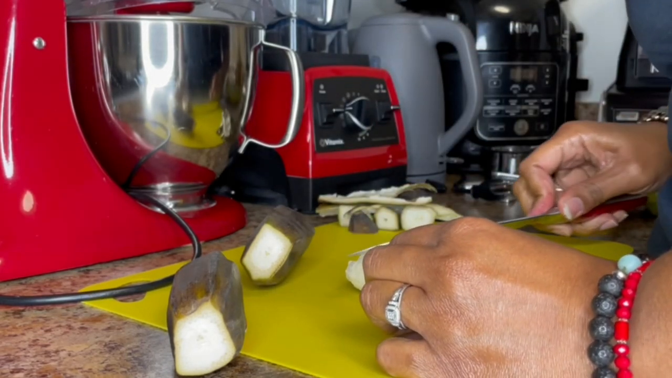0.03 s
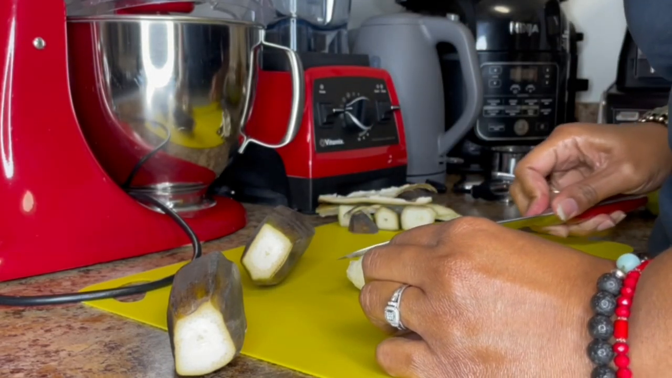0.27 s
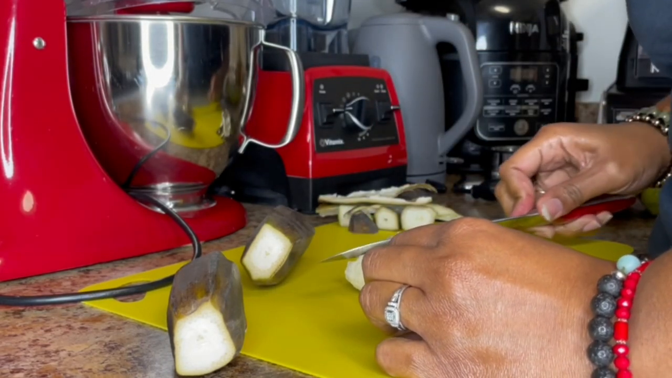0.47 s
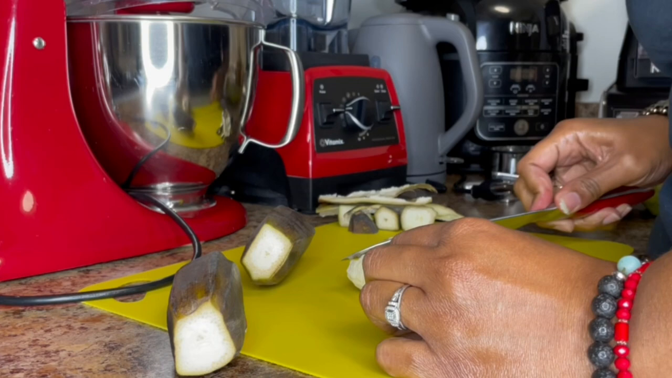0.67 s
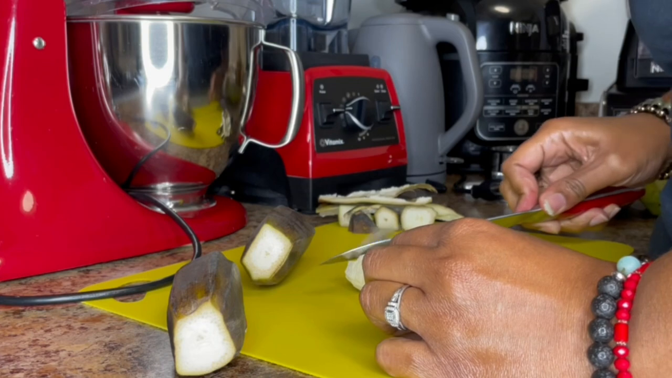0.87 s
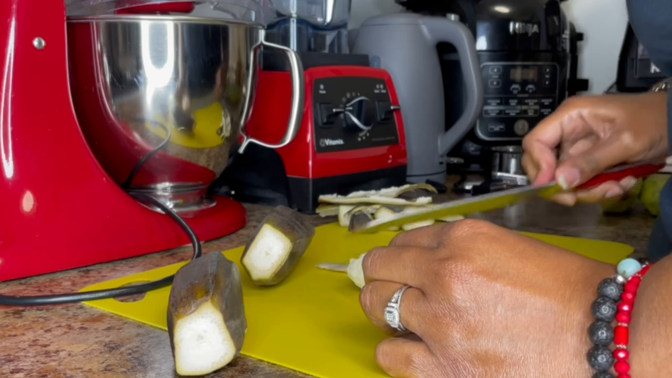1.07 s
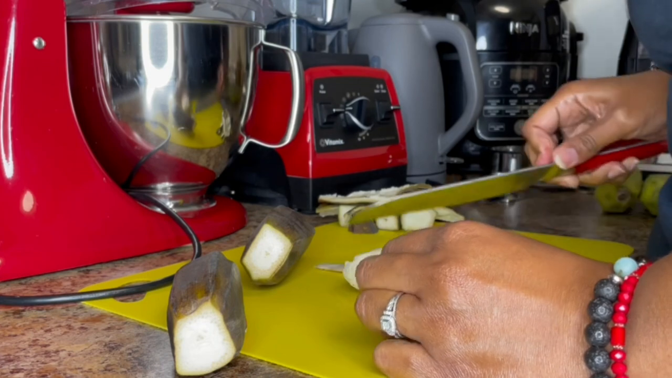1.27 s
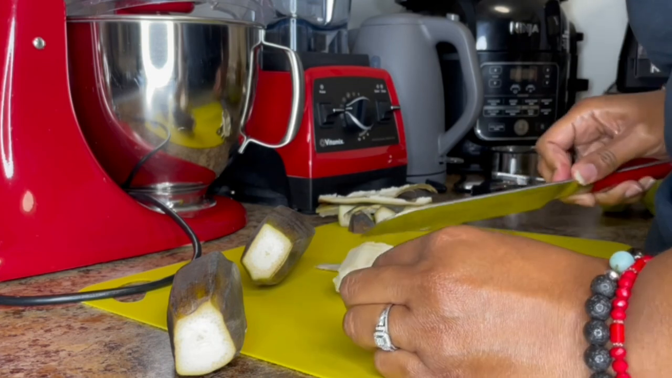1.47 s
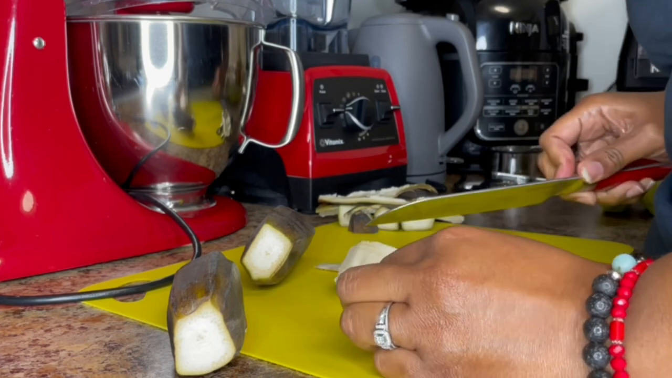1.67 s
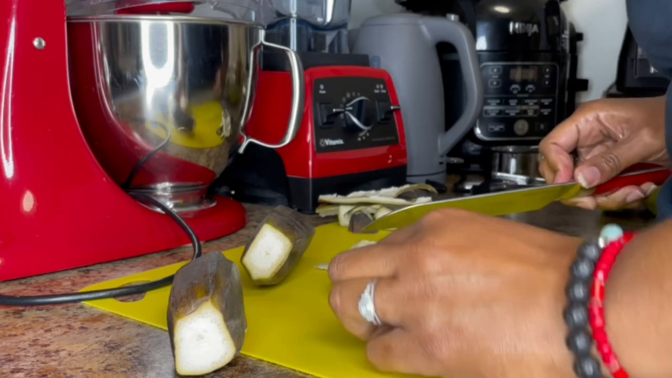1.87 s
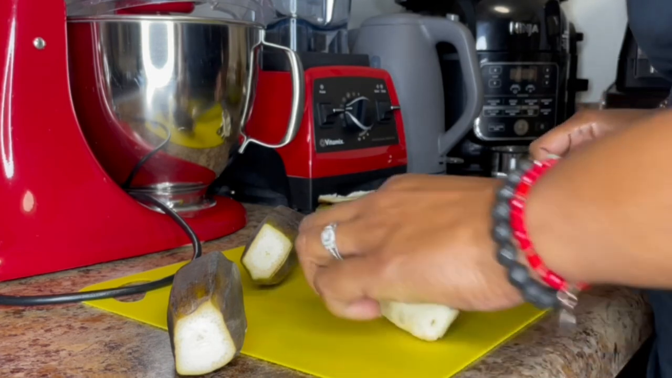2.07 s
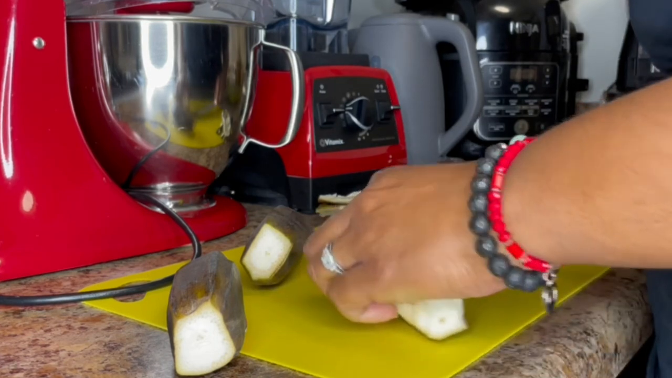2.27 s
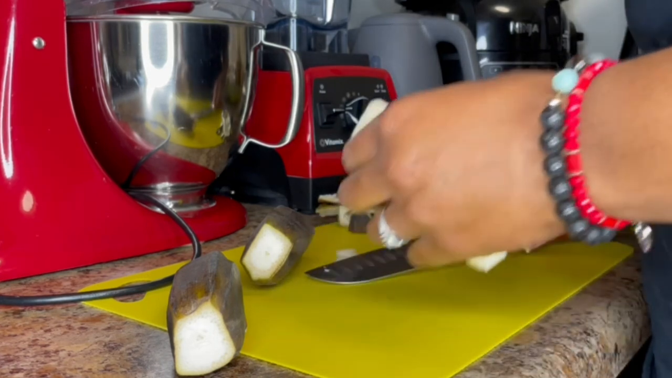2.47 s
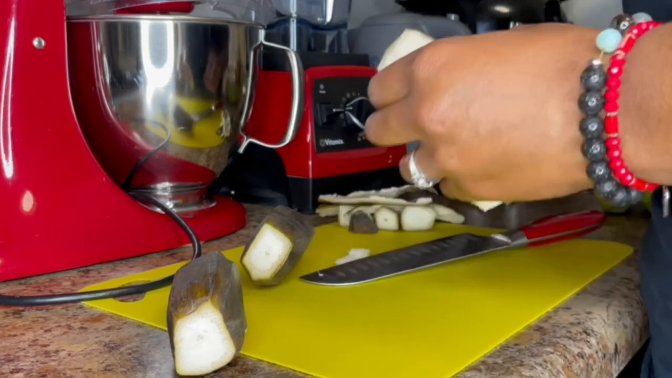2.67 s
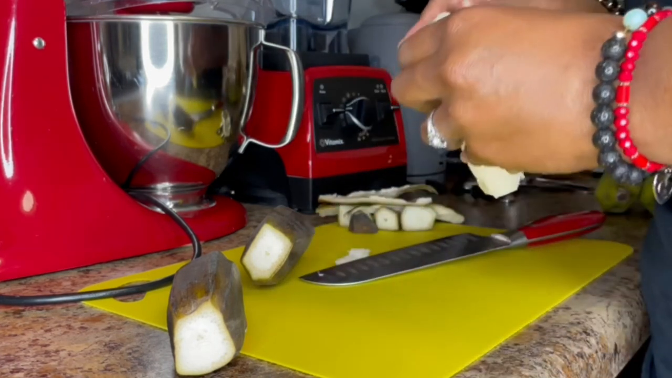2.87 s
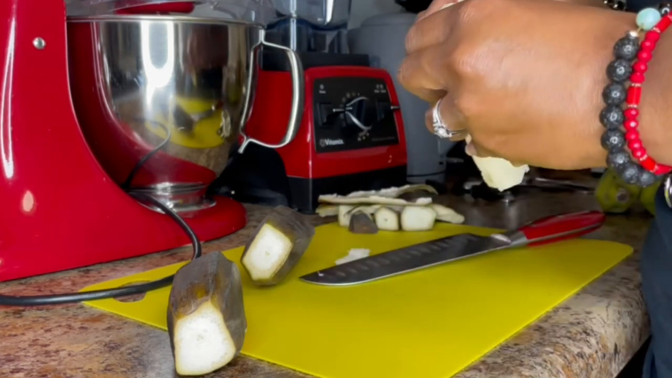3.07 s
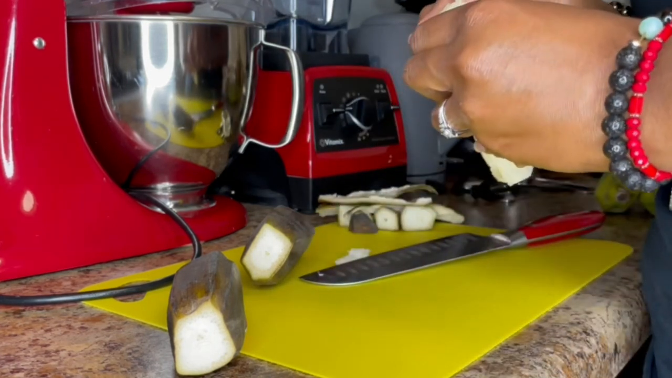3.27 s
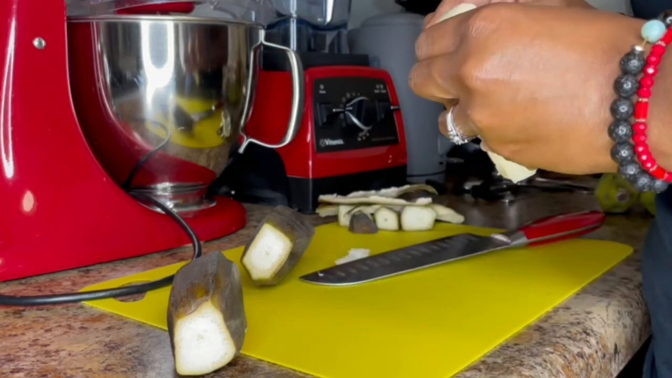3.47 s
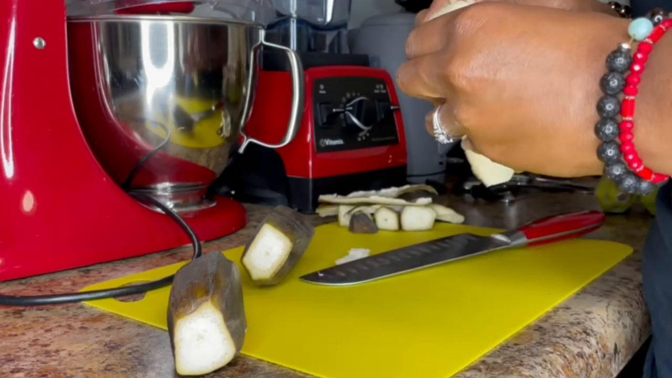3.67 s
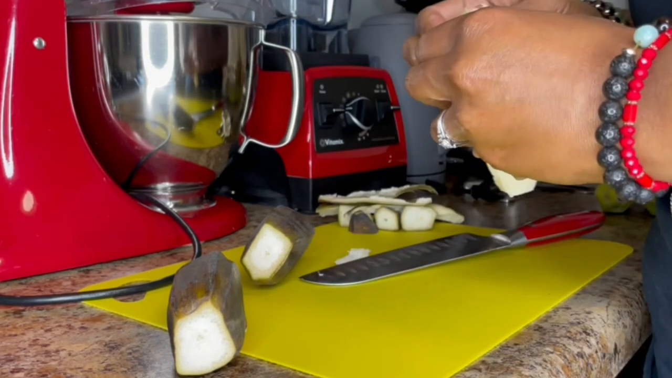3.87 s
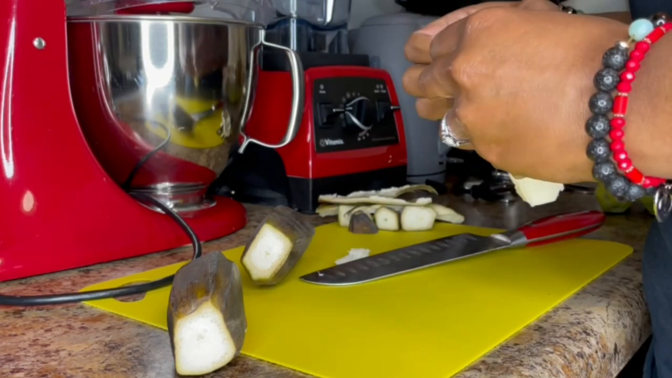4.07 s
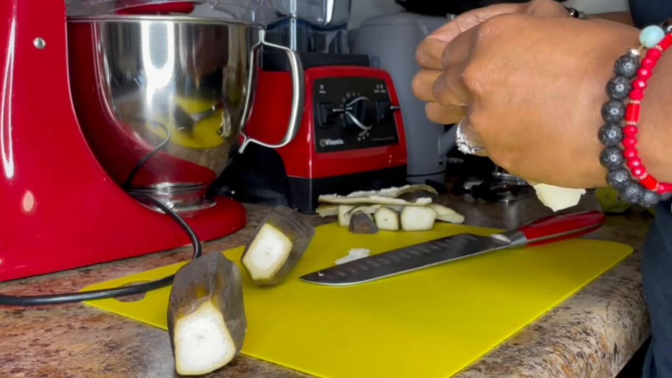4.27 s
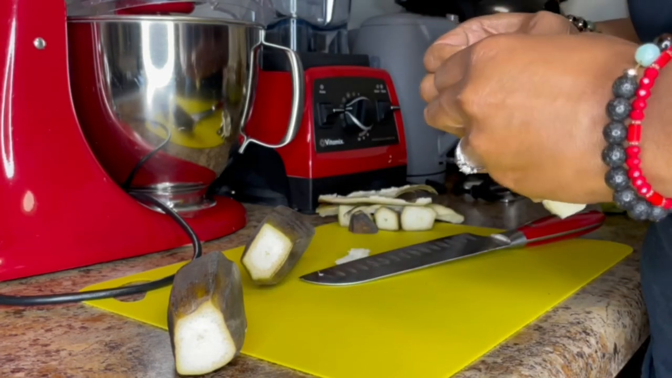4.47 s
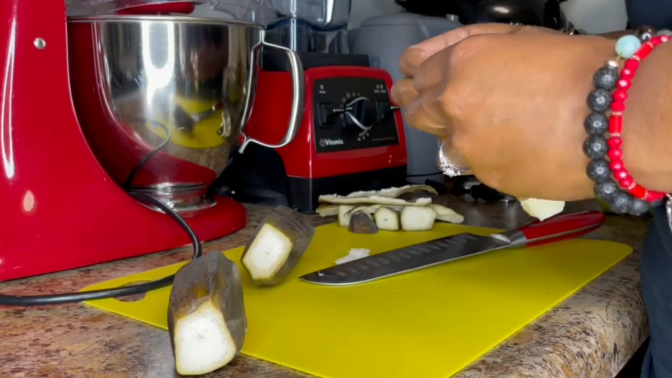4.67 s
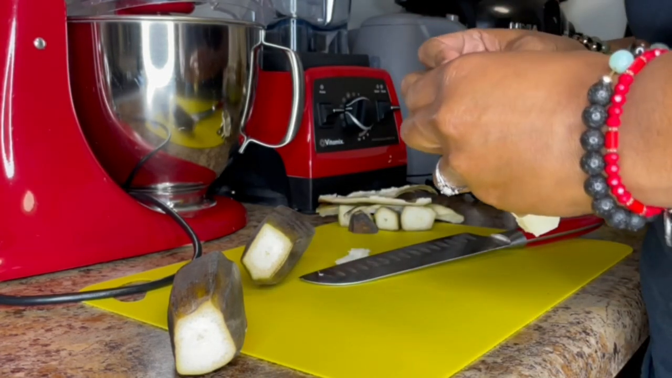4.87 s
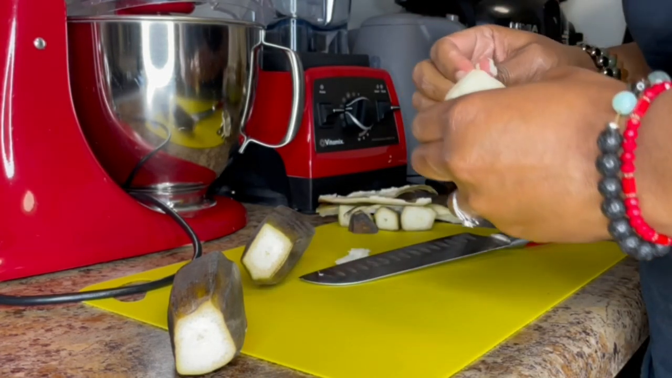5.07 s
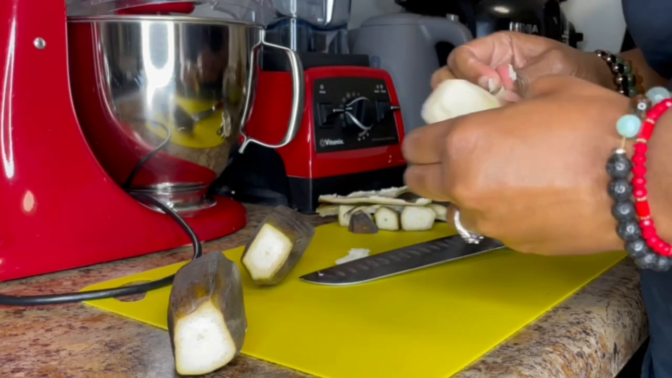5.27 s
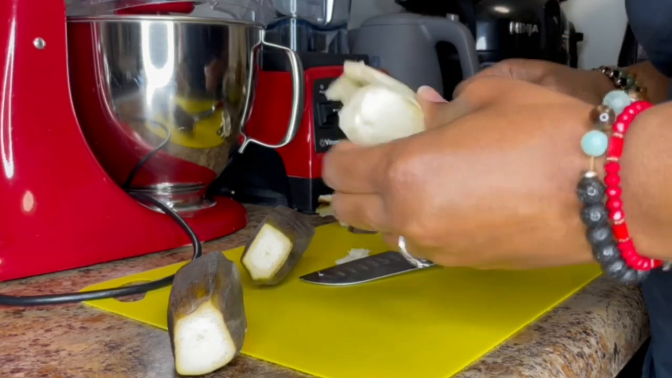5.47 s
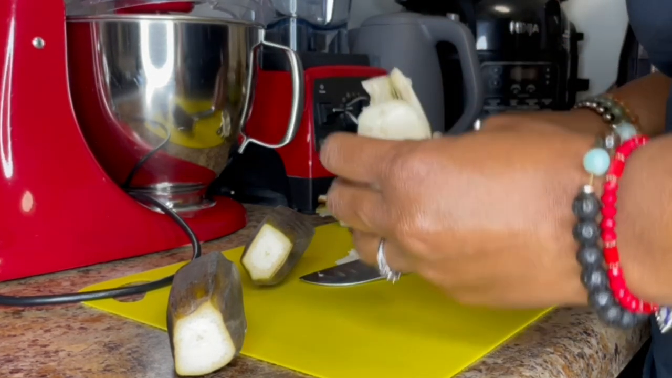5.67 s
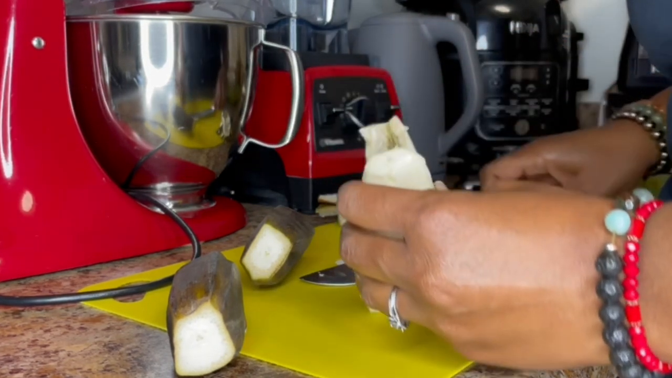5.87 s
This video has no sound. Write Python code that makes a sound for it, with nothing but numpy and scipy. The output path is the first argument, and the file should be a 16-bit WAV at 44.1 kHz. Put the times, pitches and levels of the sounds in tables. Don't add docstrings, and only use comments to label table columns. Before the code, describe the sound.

Hands peel a thick green banana in a quiet kitchen: soft sliding, one hard dull board knock, then crackling fibres, wet smacks and short rips.

```python
import sys
import numpy as np
from scipy import signal
from scipy.fft import rfft, irfft
from scipy.io import wavfile

SR = 44100
rng = np.random.default_rng(int(sys.argv[2]) if len(sys.argv) > 2 else 0)


def volts_from_decibels(level):
    exponent = np.asarray(level, float) / 20
    return 10 ** exponent


def log_audio(samples):
    frames = np.atleast_2d(samples).T
    limited = np.clip(frames, -1, 1)
    pcm = np.round(limited * 32767).astype(np.int16)
    wavfile.write(sys.argv[1], SR, pcm)


N = 261504
T = np.arange(N) / SR
AGE = T[:SR // 3]


def rms_one(x):
    return x / np.sqrt(np.mean(x ** 2) + 1e-20)


def peak_one(x):
    return x / np.abs(x).max()


def at_hz(points, hz):
    table_hz, value = np.array(points).T
    return np.interp(np.log(np.maximum(hz, 1)), np.log(table_hz), value)


def colour(x, points):
    hz = np.arange(x.shape[-1] // 2 + 1) * SR / x.shape[-1]
    closed = [(points[0][0] / 2, -60)] + list(points) + [(points[-1][0] * 1.6, -60)]
    return rms_one(irfft(rfft(x) * volts_from_decibels(at_hz(closed, hz)), x.shape[-1]))


def band(x, low_hz, high_hz):
    edges = [low_hz, min(high_hz, .45 * SR)]
    return signal.sosfilt(signal.butter(2, edges, "band", fs=SR, output="sos"), x)


def drift(rate):
    knots = np.arange(0, N / SR + 1, 1 / rate)
    return np.interp(T, knots, rng.standard_normal(800)[:len(knots)])


def ring(clicks, hz, t60):
    r, w = volts_from_decibels(-60 / (t60 * SR)), 2 * np.pi * hz / SR
    return signal.lfilter([0, np.sin(w)], [1, -2 * r * np.cos(w), r * r], clicks + 1e-18)


def burst(ms):
    return rng.standard_normal(len(AGE)) * (np.exp(-AGE * 1000 / max(ms, .1)) + 1e-12)


def unit_click():
    return (AGE == 0) + 1e-12


def add(out, s, piece):
    i = round(s * SR)
    out[i:i + len(piece)] += piece[:N - i]


def rings(table, rough_ms):
    out = np.zeros(N)
    for s, peak_db, hz, t60 in table:
        tone = ring(burst(rough_ms), hz, max(t60, .004))
        add(out, s, volts_from_decibels(peak_db) * peak_one(tone))
    return out


def gestures(s, hold, db, rise, fall):
    t = T[::32, None]
    early_db = rise * np.maximum(s - t, 0)
    late_db = fall * np.maximum(t - s - np.abs(hold), 0)
    power = np.sum(volts_from_decibels(db - early_db - late_db) ** 2, axis=1)
    return np.interp(T, t[:, 0], np.sqrt(power))


def two_ports(mid, side, alike):
    alike = np.clip(alike, -1, 1)
    return np.sqrt(1 + alike) * mid + np.sqrt(1 - alike) * side * [[1], [-1]]


# pitch_hz, level_db (per Hz)
RUMBLE_TONE = [(30, -11.5), (55, 2.5), (80, -9.5), (120, -9.5)]
# time_s, level_db
RUMBLE_LEVEL = [(0.0, -70), (0.08, -54.5), (0.31, -65.5), (0.69, -64), (0.94, -59), (1.45, -69.5),
                (1.83, -69.5), (2.29, -58.5), (2.48, -62), (2.73, -61.5), (3.0, -66.5), (3.3, -60),
                (3.63, -65), (4.35, -70), (4.59, -66), (5.05, -76.5), (5.3, -72), (5.93, -65.5)]


def rumble():
    level_db = np.interp(T, *np.transpose(RUMBLE_LEVEL))
    return volts_from_decibels(level_db) * colour(rng.standard_normal(N), RUMBLE_TONE)


# pitch_hz, level_db (per Hz)
AIR_TONE = [(12, -42.5), (20, -12), (77, 0.5), (337, -15), (446, -10.5), (718, -16), (780, -18.5),
            (949, -24), (1190, -21), (2820, -38.5), (7110, -44), (8650, -49), (12100, -38.5),
            (13200, -30.5), (16000, -42)]
# pitch_hz, likeness (0-1)
AIR_LIKENESS = [(30, 0.99), (60, 0.1), (130, 1), (290, 0), (640, 0.), (1400, 0), (3100, 0), (7000, 0),
                (13000, 0.13)]
# pitch_hz, width_hz, level_db
WHINES = [(214, 5, -76), (787.5, 6.6, -84), (15800, 40, -96)]


def hum():
    hz = np.arange(N // 2 + 1) * SR / N
    mid, side = rfft(rng.standard_normal((2, N)))
    room = colour(irfft(two_ports(mid, side, at_hz(AIR_LIKENESS, hz)), N), AIR_TONE)
    level = volts_from_decibels(-65 + 2.3 * drift(5))
    flicker = (volts_from_decibels(4.0 * drift(11)) - 1) * band(room, 5000, 18000)
    tones = 0
    for pitch_hz, width_hz, db in WHINES:
        tones = tones + volts_from_decibels(db) * rms_one(ring(rng.standard_normal(N), pitch_hz, 2.7 / width_hz))
    return level * (room + flicker) + tones


# pitch_hz, t60_s
ROOM_DECAY = [(100, .26), (300, .33), (1000, .26), (4000, .27), (13000, .17)]
# pitch_hz, likeness (0-1)
ROOM_LIKENESS = [(100, 0.8), (300, 0.5), (600, 0), (2000, 0), (6000, 0.1), (13000, 0.85)]


def kitchen(x):
    age = T[:SR // 2]
    white = rng.standard_normal((2, 2, len(age)))
    edges = 90 * 2. ** np.arange(0, 8, .5)
    tail = 0
    for k, (low_hz, high_hz) in enumerate(zip(edges, edges[1:])):
        mid, side = band(white[k % 2], low_hz, high_hz)
        pair = two_ports(mid, side, at_hz(ROOM_LIKENESS, low_hz))
        late = volts_from_decibels(-60 * age / at_hz(ROOM_DECAY, low_hz))
        early = volts_from_decibels(2.5 - 60 * age / 0.035)
        tail = tail + pair * (late + early)
    tail = tail * np.clip(age / 0.00033, 0, 1)
    tail = tail / np.sqrt(np.sum(tail ** 2) / 2)
    return signal.fftconvolve(x[None], tail, axes=1)[:, :N]


# start_s, peak_db, pitch_hz, t60_s
BUMPS = [(0.97, -47, 117, .15), (2.544, -21.5, 612, .07), (2.544, -18.5, 1034, .05),
         (2.544, -22, 335, 0.08), (2.544, -24, 710, 0.071), (2.544, -24, 890, .06),
         (0.952, -44.5, 328, 0.11), (0.955, -45, 448, .1), (0.955, -46, 239, .12),
         (2.552, -21.5, 119.8, 0.2), (2.545, -22.5, 788, 0.11), (2.546, -22, 272, .25),
         (2.275, -39, 151, .09), (2.645, -39, 115, 0.13), (2.75, -51, 247.3, 0.2),
         (5.685, -51, 119.4, 0.19), (5.85, -58.5, 90, 0.069), (5.89, -49, 112, 0.28)]


def bumps():
    return band(rings(BUMPS, 6.5), 93, 1800)


# pitch_hz, level_db (per Hz)
WEIGHT_TONE = [(70, 2), (130, -4.5), (250, 2.5), (450, -2), (800, -15)]
# start_s, hold_s, level_db
LEANS = [(0.01, 0.12, -53), (0.385, 0.025, -60.5), (0.493, .01, -84), (0.73, 0.036, -68),
         (0.884, .005, -60), (1.075, 0.024, -64), (1.334, 0.0055, -59.5), (1.441, 0.025, -61.5),
         (1.552, 0.29, -68.5), (1.919, 0.039, -63.5), (2.07, .01, -73), (2.108, .005, -76),
         (2.156, 0.027, -47), (2.292, 0.016, -43.5), (2.427, 0.18, -51), (2.815, 0.033, -57.5),
         (2.9, 0.24, -67.5), (3.286, .11, -69), (3.475, 0.11, -77.5), (3.722, .02, -68),
         (3.907, 0.0097, -70), (4.057, .03, -74), (4.32, 0.038, -68.5), (4.416, 0.025, -60),
         (4.502, .2, -74), (5.059, .01, -72.5), (5.168, 0.14, -66), (5.45, .02, -68), (5.898, .06, -56.5)]


def leans():
    press = gestures(*np.transpose(LEANS), rise=290, fall=1200)
    return press * colour(rng.standard_normal(N), WEIGHT_TONE)


def blow(low, middle, high, top, slap_db, crack_db, tick_db):
    thud = volts_from_decibels(5.5) * band(band(low, 290, 870), 99, 1300)
    slap = volts_from_decibels(slap_db + 7.5) * band(middle, 600, 1500)
    crack = volts_from_decibels(crack_db + 3.0) * band(high, 2100, 4500)
    tick = volts_from_decibels(tick_db + 7.0) * band(top, 9500, 21000)
    return thud + slap + crack + tick


def rough_blow(ms, slap_db, crack_db, tick_db):
    contacts = burst(4.0 * ms), burst(1.0 * ms), burst(0.41 * ms), burst(0.83 * ms)
    return blow(*contacts, slap_db, crack_db, tick_db)


# pitch_hz, level_db, t60_s
BOARD_MODES = [(117, -6, 0.15), (220.6, -12, 0.15), (272, -5, 0.24), (328.9, -1, 0.11), (410, -1, 0.092),
               (490, -11, 0.054), (545, -7, .1), (609, -3, 0.07), (734, -7, 0.07), (883, -7.5, 0.12),
               (1028, 3, 0.033), (1410, -12, 0.018), (1545.4, 1.5, 0.05), (1973, -9, 0.1)]
# start_s, peak_db, slap_db (0.6-1.5 kHz), crack_db (2.1-4.5 kHz), tick_db (over 9.5 kHz),
# contact_ms
KNOCKS = [
    (0.947, -28.5, -8, 0, -13, 5.5),
    (2.2631, -24, -3.5, -0.5, -25, 8.4),
    (2.5428, -2.5, -1, -16.5, -34.5, 4.8),
]


def knocks():
    near, wide, bare = np.zeros((3, N))
    click = unit_click()
    for s, peak_db, slap_db, crack_db, tick_db, ms in KNOCKS:
        contact = burst(0.21 * ms)
        body = 0
        for hz, db, t60 in BOARD_MODES:
            tone = peak_one(ring(contact, hz, min(t60, .22)))
            body = body + volts_from_decibels(db + slap_db * (hz > 700)) * tone
        body = band(body, 140, 4200)
        middle = rough_blow(ms, slap_db, crack_db, tick_db)
        ends = rough_blow(ms, slap_db, crack_db, tick_db)
        plain = blow(click, click, click, click, slap_db - 0.5, crack_db - 6.0, tick_db - 6)
        add(near, s, volts_from_decibels(peak_db) * (volts_from_decibels(-12.0) * body + volts_from_decibels(-4) * middle))
        add(wide, s, volts_from_decibels(peak_db - 3.0) * band(ends, 320, 9500))
        add(bare, s, volts_from_decibels(peak_db + 22.0) * plain)
    return near, wide, bare


# start_s, peak_db, pitch_hz, t60_s
DRAGS = [(2.425, -58, 1030, .025), (2.46, -57, 1100, .025), (2.485, -58, 980, .025),
         (2.34, -54, 2200, .006), (2.195, -54, 1650, .008), (5.845, -62, 1300, .008)]


def drags():
    return rings(DRAGS, 40.0)


# start_s, peak_db, pitch_hz, t60_s
BEADS = [(0.16, -62, 13400, .01), (2.0303, -39.5, 13200, 0.011), (2.1145, -34.5, 13150, 0.022),
         (2.123, -36, 13120, 0.02), (5.4116, -56, 13200, 0.017), (5.465, -54.5, 13260, 0.02),
         (5.6261, -51, 13250, 0.048), (5.7095, -50, 13280, 0.025), (5.7275, -56.5, 13140, 0.03)]


def bead_ticks():
    return rings(BEADS, 0.12)


# start_s, peak_db, body_db (1.3-5.5 kHz),
# length_ms
SNAPS = [(0.17, -62, -20, .8), (0.199, -64, -20, .8), (2.543, -36, 8, 2.5), (2.029, -46, -35, 1.4),
         (2.045, -50, -27, 1.8), (2.1357, -61.5, 14, 1.3), (2.5412, -19.5, -3, 1.3), (0.9464, -41, 0.5, 1),
         (3.218, -58, -18, 0.92), (3.299, -41, -15, 2.8), (3.229, -52, -32, 1.2), (3.244, -36.5, -30, 0.79),
         (3.3659, -37, -25.5, 0.91), (3.486, -50, -21, 1.3), (3.5105, -49, -25, 0.82),
         (3.7743, -61, -17, 1.85), (4.1401, -61.5, -25, 1.28), (4.5466, -56.5, -29, 2.2),
         (4.6099, -66, -16, 1.47), (4.7337, -54, -18.5, 1.4), (4.776, -60.5, -24, 0.44),
         (5.1105, -42, -13, 0.74), (5.4642, -60, -19, 0.82), (5.5275, -61, -19.5, 0.69),
         (5.6234, -55, -27, 3), (5.839, -77.5, 12.5, 1.5), (5.1775, -52, 8, .5), (5.2528, -52, 5, .4),
         (5.155, -55, -3, 1.2), (5.035, -63, -10, .8), (4.957, -62, 3, .6), (4.4013, -46, -4, 0.73),
         (4.4113, -44, -1, 1)]


def snaps():
    near, bare = np.zeros((2, N))
    click = unit_click()
    for s, peak_db, body_db, ms in SNAPS:
        crack = burst(ms)
        for level_db, low_hz, high_hz in (6.5, 7800, 24000), (6.5 + body_db, 1300, 5500):
            piece = volts_from_decibels(peak_db + level_db) * peak_one(band(crack, low_hz, high_hz))
            add(near, s, piece)
            strength = np.sqrt(np.mean(piece ** 2))
            add(bare, s, strength * rms_one(band(click, low_hz, high_hz)))
    return near, bare


# start_s, peak_db, pitch_hz, t60_s
SMACKS = [(1.7178, -61, 1250, 0.023), (1.9207, -61, 1310, 0.012), (3.3032, -42.5, 1160, 0.009),
          (3.8294, -63.5, 1076, 0.02), (3.9174, -63, 1500, 0.021), (3.9953, -60, 1034, 0.026),
          (4.052, -62.5, 1333, 0.03), (4.6385, -63, 1255, 0.032), (4.775, -63.5, 1300, 0.027),
          (4.9557, -54, 1357, 0.019), (5.1105, -55, 1320, .015), (4.402, -40, 1550, .012)]


def smacks():
    return rings(SMACKS, 1.6)


# start_s, peak_db, pitch_hz, t60_s
SQUEAKS = [(5.163, -41, 1310, .05), (5.2036, -45, 1420, .025), (5.224, -47, 1290, .03),
           (5.2475, -41.5, 1300, .03), (5.259, -44.5, 1278, 0.025), (5.289, -41, 1460, .02),
           (5.311, -48, 1395, .02), (5.872, -41, 3500, .025), (5.872, -41, 1380, 0.019),
           (5.885, -40, 1500, 0.031), (5.89, -43, 3500, .015), (5.906, -40.5, 1800, 0.014),
           (5.915, -43, 3080, .02), (5.92, -44, 1090, .02), (5.879, -43, 870, .025)]


def squeaks():
    return rings(SQUEAKS, 5.2)


# pitch_hz, level_db (per Hz)
SQUELCH_TONE = [(550, -9), (900, -10.5), (1100, -6), (1300, -1.5), (1500, -4.5), (1750, -7.5), (2400, -20)]
RASP_TONE = [(1600, -3.5), (2400, 0), (3500, 9), (5500, 3.5), (8000, -11), (10500, -22)]
HISS_TONE = [(6000, -17.5), (8500, 2.5), (10500, -6.5), (13000, -2.5), (15000, -6), (16500, -11)]


def rub_layers():
    sizes = volts_from_decibels(2.6 * np.minimum(rng.exponential(1, N), 5))
    slips = rng.random(N) < 12000.0 / SR
    grains = slips * sizes * rng.choice([-1, 1], N) * volts_from_decibels(2.8 * drift(60))
    squelch = colour(grains * sizes ** 0.36, SQUELCH_TONE)
    return squelch, colour(grains, RASP_TONE), colour(grains, HISS_TONE)


def rub(layers, table, rise, falls):
    s, hold, db, wet_db, hiss_db = np.transpose(table)
    out = 0
    for layer, level_db, fall in zip(layers, (db + wet_db, db, db + hiss_db), falls):
        out = out + layer * gestures(s, hold, level_db, rise, fall)
    return out


# start_s, hold_s, rasp_db, squelch_over_rasp_db, hiss_over_rasp_db
SLIDES = [(0.025, 0.096, -64, 5, 8), (.2, 0.081, -81.5, 2, 13.5), (.384, 0.072, -76, 2, 13),
          (.536, 0.13, -85.5, 4, 18), (.752, 0.0097, -81.5, 10, 21.5), (.81, 0.037, -95, 10, 18),
          (.872, 0.0058, -66, -2.5, 16), (1.348, .005, -77, 4, 3), (1.428, 0.049, -82, 6, -11),
          (1.69, 0.051, -90.5, 13, 12), (1.872, 0.038, -74, -3, 9), (2.06, 0.025, -83, 7, 6),
          (2.218, 0.013, -64.5, 2, -25), (2.3, 0.054, -68, 9, -9), (2.365, 0.024, -60.5, -6, -43),
          (2.43, 0.048, -72, 6.5, -18), (2.82, 0.0089, -79.5, 13, -18.5)]
SLIDE_FALL = (400, 390, 420)


def slides(layers):
    return rub(layers, SLIDES, 330, SLIDE_FALL)


# start_s, hold_s, rasp_db, squelch_over_rasp_db, hiss_over_rasp_db
FINGERS = [(3.03, 0.069, -90.5, 7, 15), (3.12, 0.019, -86, 12, 22.5), (3.2, 0.046, -93, -1, 27.5),
           (3.49, 0.029, -86.5, 1.5, 16), (3.624, 0.023, -88.5, 14.5, 1), (3.79, 0.043, -90, 13.5, 20),
           (3.912, 0.0048, -80, 13, 16), (3.96, 0.088, -91.5, 15.5, 15), (4.05, 0.029, -78.5, 2.5, 15.5),
           (4.14, 0.073, -90.5, 2.5, 19), (4.31, .01, -78, -8, 14), (4.47, 0.021, -78, -3.5, -3.5),
           (4.55, 0.1, -93, 11.5, 21), (4.76, 0.094, -99, 4.5, 17.5), (4.89, 0.021, -83.5, 10.5, 23),
           (4.96, 0.005, -63, -6, 14), (5.0, 0.2, -71.5, -9, 11.5), (5.47, 0.26, -99, -3, 17.5),
           (5.84, 0.014, -79, -2, 6)]
FINGER_FALL = (670, 750, 890)


def fingers(layers):
    return rub(layers, FINGERS, 400, FINGER_FALL)


# start_s, hold_s, rasp_db, squelch_over_rasp_db,
# hiss_over_rasp_db
TEARS = [(2.116, 0.0034, -84.5, 23, 0), (2.14, 0.012, -48, 3, -19), (2.515, 0.0045, -55, 0, -14),
         (2.528, 0.014, -67, 26, -19), (3.246, 0.02, -67.5, -3, 20.5), (3.268, .025, -62.5, -13, 9),
         (3.298, 0.0062, -48.5, -5.5, 11.5), (3.37, 0.0043, -81.5, 17, 19), (4.397, .004, -54, -4, 14),
         (5.13, .025, -62, 0, 9.5), (5.155, 0.031, -47, -3.5, 1), (5.2, 0.052, -54, 4.5, 4),
         (5.24, 0.035, -53, 3, 7), (5.275, .035, -53, 3.5, 11)]
# start_s, hold_s, rasp_db, squelch_over_rasp_db, hiss_over_rasp_db
RIPS = [
    (4.402, .018, -42, -0.5, 9),
    (5.111, 0.0075, -55, -3, 9.5),
    (5.872, 0.059, -44, 0.7, -13.5),
]
TEAR_FALL = (1700, 990, 490)


def tears(layers):
    return rub(layers, TEARS, 2900, TEAR_FALL) + rub(layers, RIPS, 7400, TEAR_FALL)


def scene():
    layers = rub_layers()
    rubbing = leans() + slides(layers) + fingers(layers) + tears(layers)
    hands = volts_from_decibels(-6.0) * rubbing + smacks() + squeaks()
    beads = bead_ticks()
    fibres, clicks = snaps()
    board, wide, bare = knocks()
    to_room = volts_from_decibels(-1) * hands + volts_from_decibels(-9) * beads + volts_from_decibels(-5) * clicks + volts_from_decibels(-11) * board + volts_from_decibels(-2.5) * bare
    near_hands = (hands + beads + fibres) * volts_from_decibels(np.array([[.6], [-.6]]))
    near_board = (board + wide * [[1], [-1]]) * volts_from_decibels(np.array([[-2.5], [-4.5]]))
    background = hum() + rumble()
    return near_hands + near_board + kitchen(to_room) + background + bumps() + drags()


def top_cut(x):
    return signal.sosfilt(signal.butter(12, 16660, fs=SR, output="sos"), x)


def record(dry):
    port_hz, port_width_hz = 8600, 3300
    notch_hz, notch_width_hz = 8800, 2450
    r, w = np.exp(-np.pi * port_width_hz / SR), 2 * np.pi * port_hz / SR
    poles = np.array([1, -2 * r * np.cos(w), r * r])
    left, right = dry[0], signal.lfilter(poles[::-1], poles, dry[1])
    mid, side = (left + right) / 2, (left - right) / 2
    gap = [notch_hz - notch_width_hz / 2, notch_hz + notch_width_hz / 2]
    leak = volts_from_decibels(-19 + 5.0 * drift(14)) * mid
    mid = signal.sosfilt(signal.butter(2, gap, "stop", fs=SR, output="sos"), mid) + leak
    side = signal.sosfilt(signal.butter(7, 11900, fs=SR, output="sos"), side)
    ports = [mid + side, mid - side]
    ports = signal.sosfilt(signal.cheby2(12, 50, 16100, fs=SR, output="sos"), ports)
    ports = np.tanh(ports)
    return top_cut(ports)


dry = scene()
out = record(dry)
log_audio(out)
```